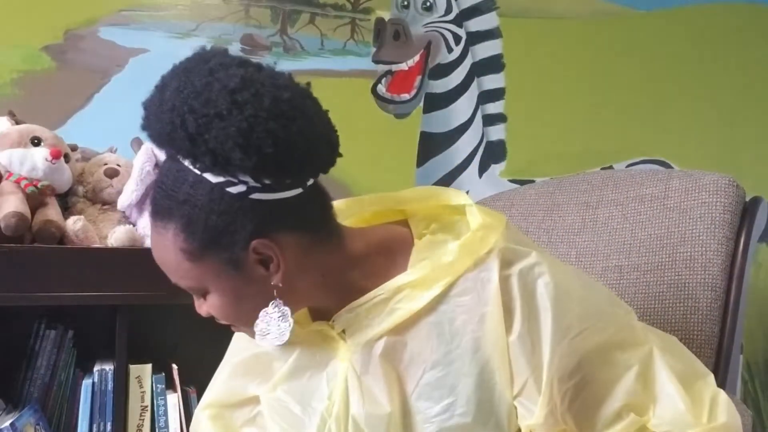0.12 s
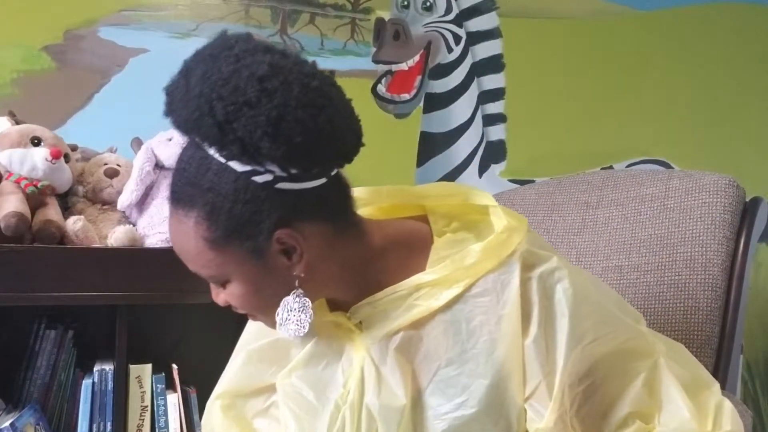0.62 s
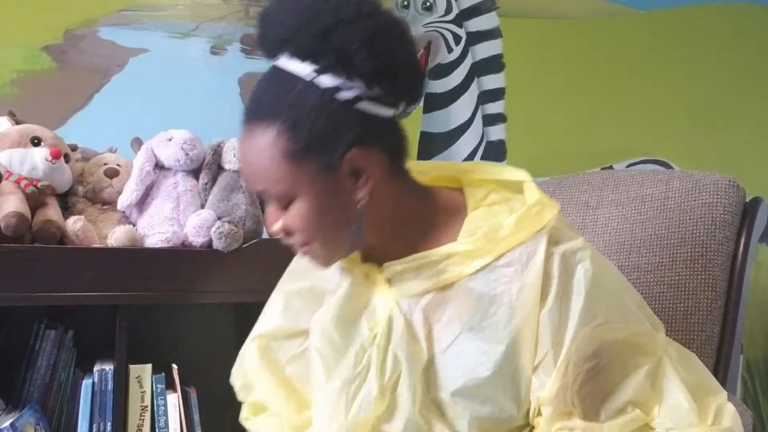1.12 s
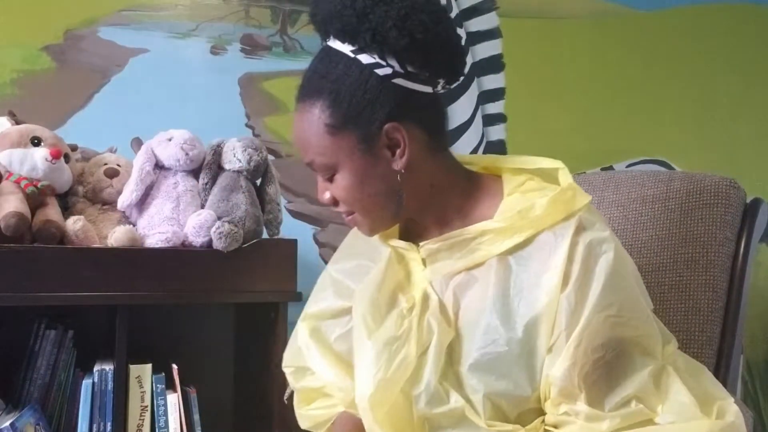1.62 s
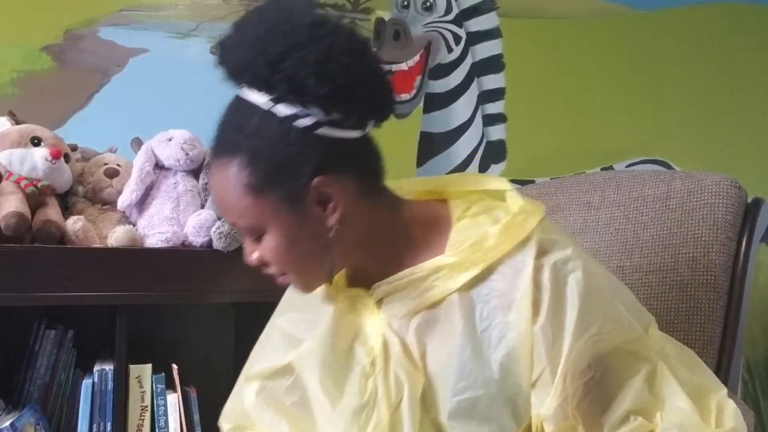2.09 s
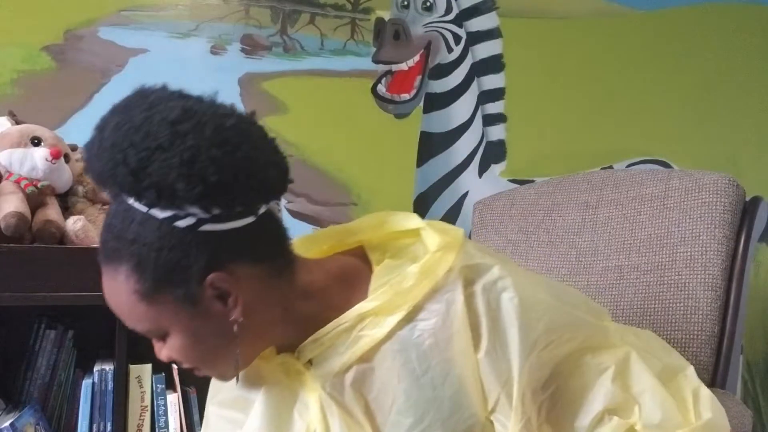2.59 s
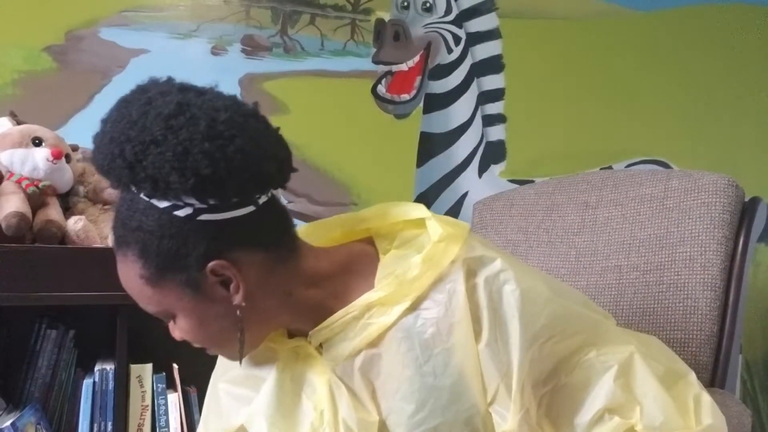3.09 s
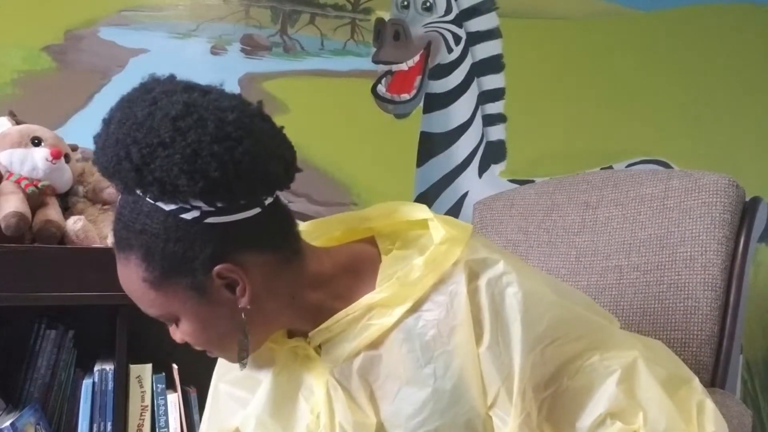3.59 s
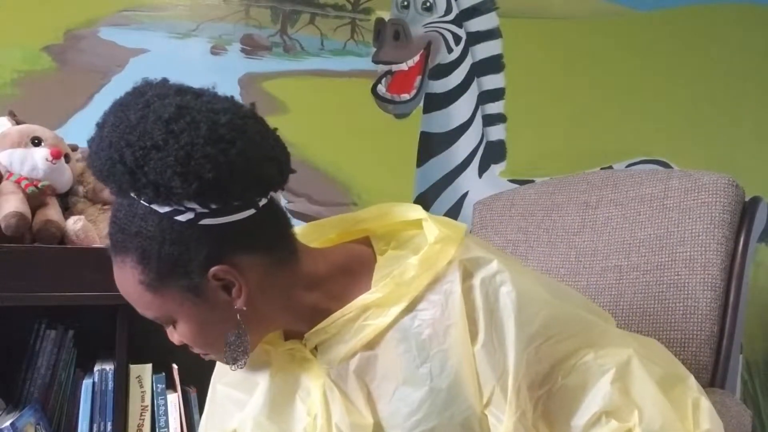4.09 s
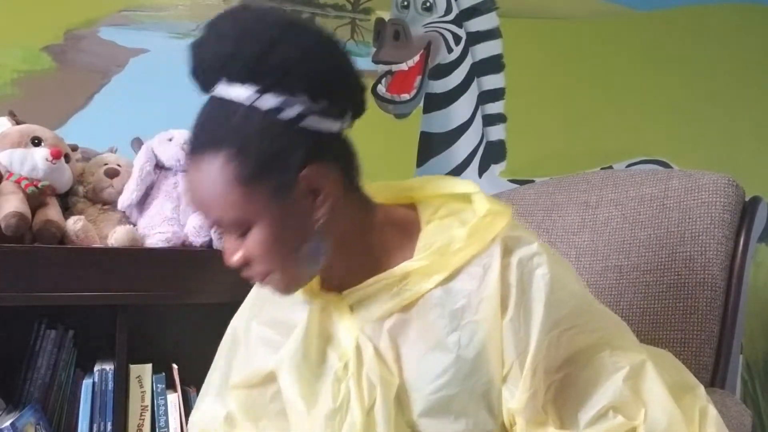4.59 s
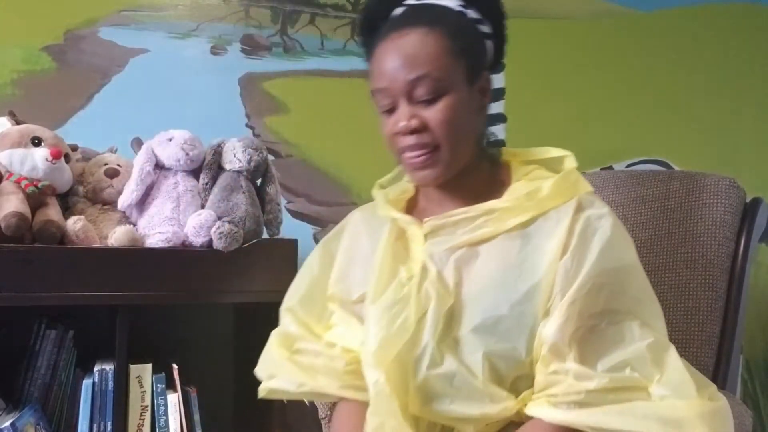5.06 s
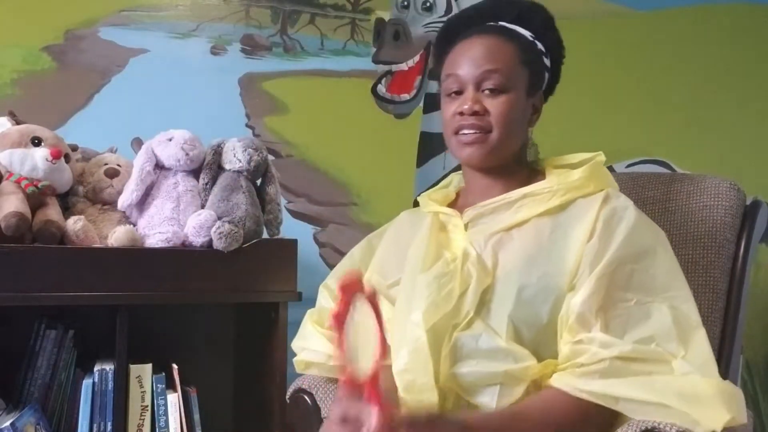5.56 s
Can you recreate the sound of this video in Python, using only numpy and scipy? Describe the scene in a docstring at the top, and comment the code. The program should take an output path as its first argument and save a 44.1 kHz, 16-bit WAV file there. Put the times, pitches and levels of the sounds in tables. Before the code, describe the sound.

A hard knock and clack of toys on a box, then a thin plastic poncho crackles and rustles, more knocks, and a hand-held toy clacks.

```python
"""A soft drag along a toy box, then a hard knock and clack as someone in a thin plastic rain poncho leans
from an armchair and rummages in a small room. The film is noise and random clicks in bands, plus larger snaps;
box, toys and seat are decaying modes struck or rubbed; hard contacts are short noise bursts. A toy clacks in
the hand at the end. Two close microphone ports hear it with diffuse reflections and a faint room hiss."""
import sys
import numpy as np
from scipy import signal
from scipy.io import wavfile
from scipy.ndimage import map_coordinates

SR = 44100
rng = np.random.default_rng(int(sys.argv[2]) if len(sys.argv) > 2 else 0)


def rack_gain(trim_db):
    """Turn a fader trim in dB into the linear factor to multiply a signal by."""
    fader = np.asarray(trim_db, float)
    return 10 ** (fader / 20)


def generate_wav(sig):
    """Save sig (samples, or channels by samples) to the path in sys.argv[1] as 16-bit PCM at SR."""
    pcm = np.round(np.clip(np.atleast_2d(sig).T, -1, 1) * 32767).astype(np.int16)
    wavfile.write(sys.argv[1], SR, pcm)


N = 251059
EDGES_HZ = 40 * 2 ** np.arange(0, 9.5, .5)   # half-octave bands


def in_time(rows):
    """Columns of a curve table, one value per sample."""
    s, *columns = np.transpose(rows)
    return [np.interp(np.arange(N) / SR, s, c) for c in columns]


def at_hz(points, hz):
    """A spectrum table read on a log-frequency axis."""
    table_hz, values = np.transpose(points)
    return np.interp(np.log(hz), np.log(table_hz), values)


def rms_one(x):
    """Scaled to unit power."""
    return x / np.sqrt(np.mean(x ** 2) + 1e-20)


def band(x, low_hz, high_hz):
    """Butterworth band-pass."""
    sos = signal.butter(2, [low_hz, min(high_hz, .45 * SR)], "band", fs=SR, output="sos")
    return signal.sosfilt(sos, x + 1e-18)


def drift(rate_hz):
    """Slow chance with spread 1: low-passed noise, computed every 40 samples."""
    r = np.exp(-80 * np.pi * rate_hz / SR)
    white = rng.standard_normal(N // 40 + 2002)
    slow = signal.lfilter([1], [1, -2 * r, r * r], white)[2000:]
    return np.interp(np.arange(N) / 40, np.arange(len(slow)), rms_one(slow))


def ring(force, modes):
    """A body as parallel decaying modes of alternating sign."""
    out = 0
    for k, (hz, level_db, t60_s) in enumerate(modes):
        r = rack_gain(-60 / (t60_s * SR))
        w = 2 * np.pi * hz / SR
        gain = (-1) ** k * rack_gain(level_db) * np.sin(w)
        out = out + signal.lfilter([0, gain], [1, -2 * r * np.cos(w), r * r], force + 1e-18)
    return out


def strike(times_s, level_db, centre_hz, spread_oct, modes, scatter_db):
    """Where a body is hit decides which modes speak: those near the centre, 6 dB down one spread away."""
    out = 0
    chance = rng.standard_normal((len(times_s), len(modes)))
    samples = np.round(times_s * SR).astype(int)
    for k, mode in enumerate(modes):
        away = np.log2(mode[0] / centre_hz) / spread_oct
        gains = rack_gain(level_db - 6 * away ** 2 + scatter_db * chance[:, k])
        out = out + (-1) ** k * ring(np.bincount(samples, gains, N), [mode])
    return out


# Diffuse sound. Each row: frequency in Hz, left-right likeness (0 to 1).
LIKENESS = [(30, .9), (70, .985), (150, .98), (300, .66), (700, .4), (2000, .0), (16000, .0)]


def diffuse(size, shape):
    """Half-octave bands of two-port noise, alike in the bass; shape(hz) is each band's gain."""
    out = 0
    white = rng.standard_normal((2, 2, size))
    for k, (low, high) in enumerate(zip(EDGES_HZ, EDGES_HZ[1:])):
        hz = np.sqrt(low * high)
        mid, side = band(white[k % 2], low, high)
        alike = np.clip(at_hz(LIKENESS, hz), 0, 1)
        pair = np.sqrt(1 + alike) * mid + np.sqrt(1 - alike) * side * [[1], [-1]]
        out = out + shape(hz) * pair
    return out


# Hiss spectrum. Each row: frequency in Hz, relative band level in dB.
HISS_SPECTRUM = [(18, -34), (30, 1), (118, 9), (221, 5.5), (1540, -9), (2480, -14), (3580, -12), (7670, -4),
                 (9460, -30.5), (12600, 5.5), (16000, -30)]


def hiss():
    """Steady diffuse noise of the room."""
    return rack_gain(-72.5) * rms_one(diffuse(N, lambda hz: rack_gain(at_hz(HISS_SPECTRUM, hz))))


# Room decay. Each row: frequency in Hz, t60 in seconds.
ROOM_T60 = [(100, 0.24), (260, 0.25), (700, 0.24), (1800, 0.25), (5000, 0.25), (13000, 0.14)]


def room(x, count=16):
    """Noise tails dying band by band; the moving source meets another of count patterns every 0.2 s."""
    hop, size = SR // 5, SR * 2 // 5
    t = np.arange(count * size) % size / SR
    tails = diffuse(len(t), lambda hz: rack_gain(-60 * t / at_hz(ROOM_T60, hz)) * (1 - np.exp(-t / 0.001)))
    tails = tails.reshape(2, count, size) / np.sqrt(np.sum(tails ** 2) / 2 / count)
    padded = np.pad(x, (hop, 2 * hop))
    out = np.zeros((2, N + 3 * hop + size))
    for k, i in enumerate(range(0, N + hop, hop)):
        piece = padded[i:i + 2 * hop] * np.hanning(2 * hop) ** .5   # equal-power overlap
        out[:, i:i + 2 * hop + size - 1] += signal.fftconvolve(piece[None], tails[:, k % count], axes=1)
    return out[:, hop:hop + N]


PATCHY_DB = 1.4   # chance level wander of rumble and rustle
# Seat and floor modes. Each row: frequency in Hz, level in dB, t60 in seconds.
SEAT_MODES = [(44.2, -8.5, 0.081), (62, -4.5, 0.065), (80.6, -9.5, 0.13), (89.8, -8, 0.12),
              (121.5, -6.5, 0.074), (176, -10, 0.024)]
# Weight shifting on the seat. Each row: time in seconds, relative rumble level in dB.
WEIGHT = [(0, -62), (.2, -77), (.65, -55), (.76, -46.5), (1.0, -69), (1.65, -68.5), (1.85, -53),
          (2.07, -68.5), (2.2, -68), (2.5, -60), (2.68, -71.5), (3.2, -72.5), (4.4, -77), (5.0, -68),
          (5.69, -71)]


def rumble():
    """Weight shifting shakes the seat frame: noise drives its modes."""
    level_db, = in_time(WEIGHT)
    shake = rms_one(ring(rng.standard_normal(N), SEAT_MODES))
    return rack_gain(level_db - 8.5 + PATCHY_DB * drift(18.0)) * shake


# Drags along the box. Each row: start in seconds, length in seconds, level in dB, wall mode in Hz.
DRAGS = [(0.023, 0.046, -56.5, 372.5), (0.873, 0.036, -60.5, 766), (1.744, 0.074, -54, 443),
         (1.845, 0.052, -56.5, 246)]


def drags():
    """Slipping contact keeps one wall mode humming unevenly; it swells and fades."""
    t = np.arange(N) / SR
    waver = 1 + 0.045 * drift(26.0)   # pitch wander as a share
    flutter = rack_gain(3 * drift(34.0))   # level wander, dB
    phase_per_hz = 2 * np.pi * np.cumsum(waver) / SR
    out = 0
    for s, length_s, level_db, hz in DRAGS:
        swell = np.sin(np.pi * np.clip((t - s) / length_s, 0, 1)) ** .5
        out = out + rack_gain(level_db) * swell * np.sin(hz * phase_per_hz)
    return flutter * out


# Box wall modes. Each row: frequency in Hz, level in dB, t60 in seconds.
BOX_MODES = [(193, 6.5, 0.034), (245, 1.5, 0.06), (280, 1.5, 0.042), (311, 4.5, 0.043), (347.6, 3.5, 0.045),
             (378.4, -1.5, 0.081), (452.7, -1.5, 0.049), (529.4, -0.5, 0.056), (622, -0.5, 0.053),
             (708, 5, 0.03), (770, 3.5, 0.037), (855, -6, 0.08)]
# Toys knocking the box. Each row: time in seconds, wall ring in dB, ring centre in Hz, thud in dB.
KNOCKS = [(0.002, -53, 188, -63), (0.476, -27.5, 390, -24.5), (0.501, -49, 409, -53),
          (0.522, -65, 361, -29), (0.684, -45.5, 258, -24), (0.737, -39, 207, -55),
          (0.799, -47, 213, -37.5), (0.869, -69, 302, -53), (1.592, -54, 390, -57), (1.779, -52, 446, -62),
          (1.872, -55.5, 244, -55), (2.145, -55.5, 280, -46.5), (2.18, -63, 280, -41), (2.2, -54, 339, -55),
          (2.296, -51, 466, -78), (2.79, -59.5, 540, -87), (3.24, -49.5, 830, -74), (3.555, -60, 855, -75),
          (3.628, -28.5, 404, -47), (3.644, -38, 253, -44), (3.664, -36.5, 441, -70),
          (3.825, -30, 480, -71), (3.844, -46, 482, -44.5), (3.884, -28.5, 480, -57),
          (3.891, -37, 245, -49), (3.918, -48, 452, -64), (4.098, -56.5, 393, -79), (5.13, -49, 579, -82),
          (5.295, -64, 366, -78), (5.392, -47, 603, -79), (5.451, -55, 398, -68)]


def knocks():
    """The box walls ring and the floor under it thuds."""
    s, ring_db, ring_hz, thud_db = np.transpose(KNOCKS)
    spread_oct = np.minimum(273 / ring_hz, .75)   # narrower at higher centres
    walls = strike(s, ring_db, ring_hz, spread_oct, BOX_MODES, scatter_db=2.06)
    thud = strike(s, thud_db, 110, 0.82, SEAT_MODES, scatter_db=3.5)
    return band(walls, 110, 830) + band(thud, 26, 140)


# Toy shell modes. Each row: frequency in Hz, level in dB, t60 in seconds.
TOY_MODES = [(800, 5.5, 0.018), (1050, -0.5, 0.021), (1165, -1, 0.031), (1340, 4, 0.013),
             (1420, 3.5, 0.012), (1800, 0.5, 0.011), (1988, -5.5, 0.026), (2274, 1, 0.016),
             (2600, 4, 0.013), (3038, 2, 0.011), (3460, -4.5, 0.015)]
# Hard toys meeting. Each row: time in seconds, shell ring in dB, ring centre in Hz, spread in octaves,
# crack in dB.
CLACKS = [(0.468, -33.5, 955, 0.27, -18), (0.4772, -30, 2720, 1.07, 2), (0.488, -40, 2600, 0.25, -17),
          (0.5, -57, 2750, 0.5, -12), (0.686, -52, 974, 0.24, -27), (0.692, -43, 920, 0.51, -14.5),
          (0.736, -45, 1640, 0.4, -9), (0.82, -42, 875, 0.22, -20.5), (1.596, -47, 1350, 0.4, -23.5),
          (1.851, -64, 1340, 0.31, -42), (2.201, -53, 1150, 0.88, -37), (2.6517, -47, 1340, 0.38, -47),
          (2.7887, -45, 2600, 0.77, -13), (2.7965, -60, 2600, 0.76, -14), (3.2418, -46, 2550, 0.42, -24),
          (3.247, -49.5, 1080, 0.42, -33), (3.4207, -56.5, 1940, 0.65, -35),
          (3.5536, -59.5, 2600, 0.65, -31.5), (3.6288, -32.5, 1300, 1.0, -10.5),
          (3.646, -45, 1400, 0.77, -37), (3.8233, -41.5, 1400, 0.97, -24), (3.8791, -41, 1400, 1.23, -15.5),
          (4.0935, -54, 1330, 0.97, -31), (4.099, -57, 1400, 0.96, -29), (4.106, -50.5, 1300, 0.85, -25),
          (4.449, -50, 1390, 0.62, -35), (5.128, -36.5, 1800, 0.7, -10)]


def clacks():
    """Hollow hard shells ring briefly."""
    s, ring_db, ring_hz, spread_oct, _ = np.transpose(CLACKS)
    return band(strike(s, ring_db, ring_hz, spread_oct, TOY_MODES, scatter_db=2.0), 470, 4660)


# Toy held in the hand. Each row: time in seconds, shell ring in dB, spread in octaves, sizzle in dB,
# sizzle half-width in octaves.
TAPS = [(5.129, -55, 0.35, -0.5, 0.81), (5.394, -33, 0.52, -8, 0.18), (5.4571, -47.5, .6, -43, 0.56),
        (5.6506, -28.5, 0.24, -17.5, 0.17)]


def taps():
    """The toy in the hand rings in a group of shell modes."""
    s, ring_db, spread_oct, _, _ = np.transpose(TAPS)
    return band(strike(s, ring_db, 1754, spread_oct, TOY_MODES, scatter_db=5.0), 1200, 3100)


def cracks():
    """Few-ms scuffles of tiny contacts, and clicks of equal energy before filtering for the room to smear."""
    crack_hz, crack_oct, sizzle_hz, contact_s = 6940, 1, 11240, 0.0023
    t = np.arange(2048) / SR
    out = np.zeros((2, N + len(t)))
    rows = [(s, db, crack_hz, crack_oct) for s, *_, db in CLACKS]
    rows += [(s, db, sizzle_hz, octaves) for s, *_, db, octaves in TAPS]
    noises = rng.standard_normal((len(rows), len(t)))
    for (s, level_db, hz, octaves), noise in zip(rows, noises):
        scuffle = noise * np.exp(-t / contact_s)
        pair = np.array([scuffle / np.sqrt(np.sum(scuffle ** 2)), t == 0])
        wide = 2 ** octaves
        pair = band(band(pair, hz / wide, hz * wide), hz / wide ** 2, hz * wide ** 2)
        out[:, round(s * SR):][:, :len(t)] += rack_gain(level_db) * pair
    return out[:, :N]


# Largest creases snapping through. Each row: time in seconds, peak in dB, centre in Hz.
SNAPS = [(0.8782, -37, 4740), (0.915, -40, 2750), (1.3087, -38, 2140), (1.3618, -37.5, 4030),
         (1.4376, -27.5, 3630), (1.449, -39, 6450), (1.492, -29.5, 7800), (1.5099, -32.5, 3070),
         (1.6368, -41, 1800), (2.3003, -39.5, 2640), (2.534, -50, 2160), (4.1879, -44.5, 7010),
         (4.3932, -47, 8560), (4.5673, -44, 7600), (4.6537, -44, 2100), (4.884, -33.5, 2140),
         (5.0514, -34, 1800), (5.099, -34, 7670), (5.5944, -48, 1900)]


def snaps():
    """A buckling crease gives a click of a few cycles around its own pitch."""
    t = np.arange(400) / SR
    out = np.zeros(N + len(t))
    noises = rng.standard_normal((len(SNAPS), len(t)))
    for (s, peak_db, hz), noise in zip(SNAPS, noises):
        click = band(noise * np.exp(-t / 0.00099), hz / 3.1, hz * 1.95)
        out[round(s * SR):][:len(t)] += rack_gain(peak_db) * click / np.abs(click).max()
    return out[:N]


# Film spectrum. Each row: frequency in Hz, relative level in dB per Hz.
FILM_SPECTRUM = [(120, -36.5), (200, -13.5), (473, 2), (601, -5.5), (777, -3.5), (1650, -8), (1810, -8),
                 (7680, -14.5), (9400, -17), (12600, -12), (16000, -14)]
# How hard the film is worked. Each row: time in seconds, relative level of the low and middle rustle in dB,
# relative level of the fine crinkle in dB.
MOVE = [(0.0, -66, -69), (0.2, -82.5, -70.5), (0.62, -69.5, -64.5), (0.72, -54.5, -61), (0.86, -56, -53),
        (0.95, -58, -57.5), (1.03, -58.5, -55.5), (1.36, -54.5, -53.5), (1.56, -60, -58.5),
        (1.62, -58.5, -57), (1.69, -58, -59.5), (1.86, -51, -55), (1.92, -64, -59), (2.07, -58.5, -58),
        (2.17, -57, -56.5), (2.2, -49, -56.5), (2.26, -58.5, -53.5), (2.32, -49.5, -55), (2.55, -54.5, -51),
        (2.75, -76.5, -70.5), (3.17, -74, -62.5), (3.49, -82, -71.5), (4.05, -86, -81.5), (4.2, -82, -71),
        (4.35, -77.5, -65), (4.5, -68, -60), (4.72, -66, -62.5), (4.92, -54.5, -53), (5.1, -52.5, -47),
        (5.22, -61.5, -56), (5.38, -56.5, -51.5), (5.6, -68.5, -63.5), (5.69, -60.5, -57)]


def rustle():
    """Thousands of tiny creases a second, a few large, in clumps; their reflections merge to diffuse noise."""
    fold_db, crinkle_db = in_time(MOVE)
    rub_db = fold_db - 4   # soft rubbing lies under the fold rustle
    clump_hz = 40
    clumps = drift(clump_hz)
    born = rng.random((4, N)) < 1500 * rack_gain(3.0 * clumps) / SR
    sizes = rack_gain(4.2 * np.minimum(rng.exponential(1, (4, N)), 6))
    trains = born * sizes * rng.choice([-1, 1], (4, N))
    direct, gains = 0, []
    for k, (low, high) in enumerate(zip(EDGES_HZ, EDGES_HZ[1:])):
        hz = np.sqrt(low * high)
        # one train clicks in every band, the others only in some
        grains = 0.42 * rms_one(trains[0]) + 0.45 * rms_one(trains[1 + k % 3])
        grains = grains + 0.6 * rng.standard_normal(N)
        rub = np.clip(np.log2(1300 / hz), 0, 1)
        crinkle = np.clip(np.log2(hz / 2500), 0, 1)
        level_db = rub * rub_db + crinkle * crinkle_db + (1 - rub - crinkle) * fold_db
        flicker_db = PATCHY_DB * (clumps / 2 + drift(clump_hz / 2))   # partly each band's own
        gains.append(rack_gain(15.5 + level_db + at_hz(FILM_SPECTRUM, hz) + flicker_db))
        direct = direct + gains[-1] * band(grains, low, high)
    fade = rack_gain(-60 / (.2 * SR)) ** 2   # reflected power lingers with a 0.2 s t60
    lingering = iter(np.sqrt(signal.lfilter([1 - fade], [1, -fade], np.square(gains))))
    return direct, rack_gain(-1.0) * diffuse(N, lambda hz: next(lingering))


# Hands start far to one side, come to the middle, reach out again and return just past the middle.
# Each row: time in seconds, left port later by ms.
HANDS = [(0, 0.17), (1.0, 0.016), (2.25, 0.012), (2.75, 0.11), (4.25, 0.13), (5.0, -0.014), (5.69, -0.019)]


def at_ports(near):
    """The path difference delays one port against the other, half the lag each way."""
    lag_ms, = in_time(HANDS)
    half_lag = lag_ms * SR / 2000   # samples
    return np.array([map_coordinates(near, [np.arange(N) + sign * half_lag], order=3) for sign in (-1, 1)])


def scene():
    """Direct sound reaches the two ports at slightly different times; reflections and hiss are diffuse."""
    bodies = knocks() + clacks() + drags()
    film, seat, toy = snaps(), rumble(), taps()
    crack, crack_click = cracks()
    creases, creases_reflected = rustle()
    direct = at_ports(bodies + toy + crack + film + creases + seat)
    # held close to the ports, the toy sounds drier; the larger snaps send less to the walls
    sent = bodies + rack_gain(-2) * toy + rack_gain(-2.0) * crack_click + rack_gain(-6) * film + rack_gain(-0.5) * seat
    wet = room(rack_gain(3.5) * sent)
    port_gain = rack_gain(np.array([[.4], [-.4]]))
    return (direct + wet + creases_reflected + hiss()) * port_gain


# Casing resonances. Each row: frequency in Hz, width in Hz, left lift in dB, right lift in dB.
PORTS = [(2550, 1500, 1, 1.5), (4170, 5000, 2, -0.5), (7720, 880, 6, 4), (13930, 9900, -3.5, -0.5)]


def casing(x):
    """Resonances lift or dip a few treble bands, differently at each port."""
    for hz, width_hz, *lift_db in PORTS:
        r = np.exp(-np.pi * width_hz / SR)
        poles = [1, -2 * r * np.cos(2 * np.pi * hz / SR), r * r]
        peak = signal.lfilter(np.array([1, 0, -1]) * (1 - r * r) / 2, poles, x)
        x = x + (rack_gain(np.array(lift_db))[:, None] - 1) * peak
    return x


def top_cut(x):
    """Nothing passes above the cut-off."""
    return signal.sosfilt(signal.butter(12, 17000, fs=SR, output="sos"), x)


def record(dry):
    """The casing colours the treble; a steep low-pass cuts the top."""
    low_pass = signal.cheby2(14, 35, 15900, fs=SR, output="sos")   # order, stopband dB, stopband edge Hz
    mix = signal.sosfilt(low_pass, casing(dry))
    return top_cut(mix)


dry = scene()
out = record(dry)
generate_wav(out)
```